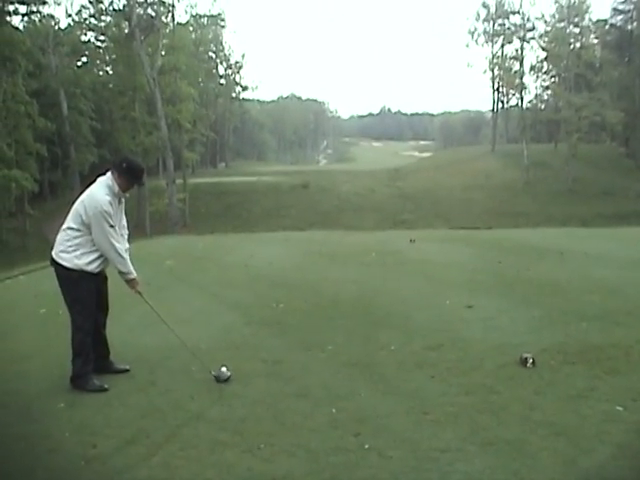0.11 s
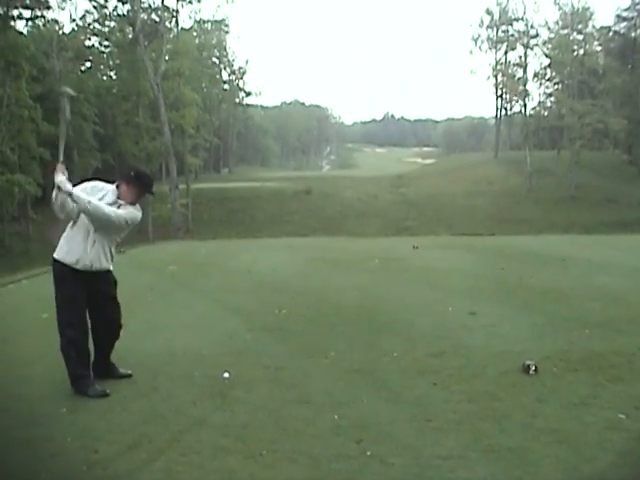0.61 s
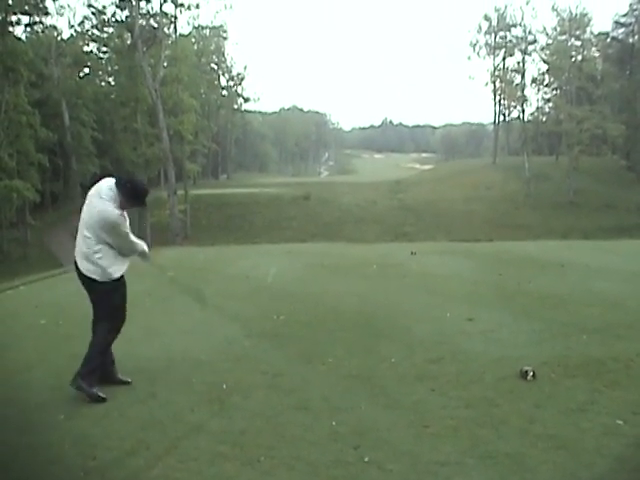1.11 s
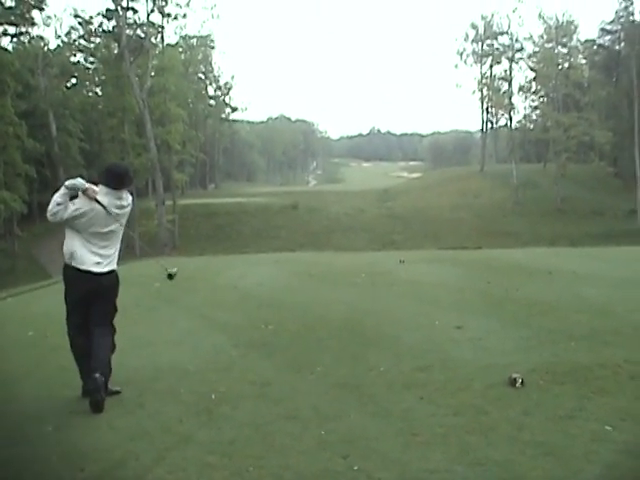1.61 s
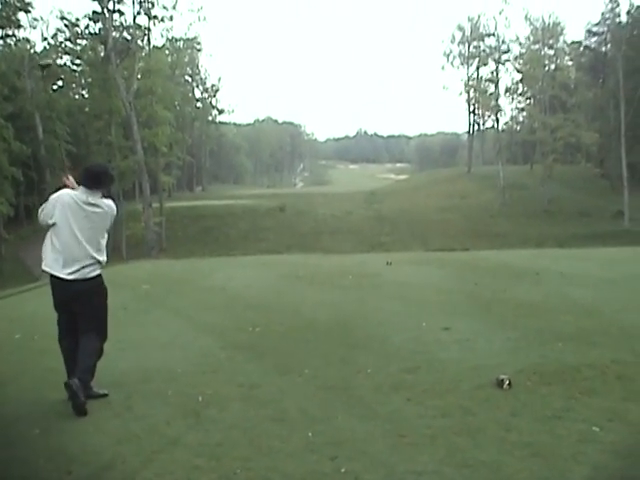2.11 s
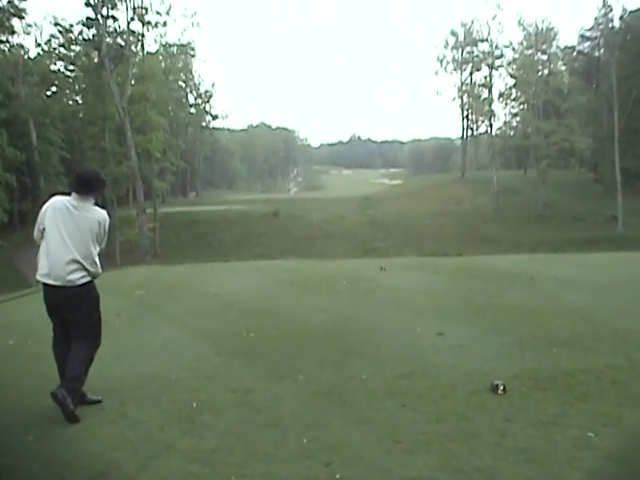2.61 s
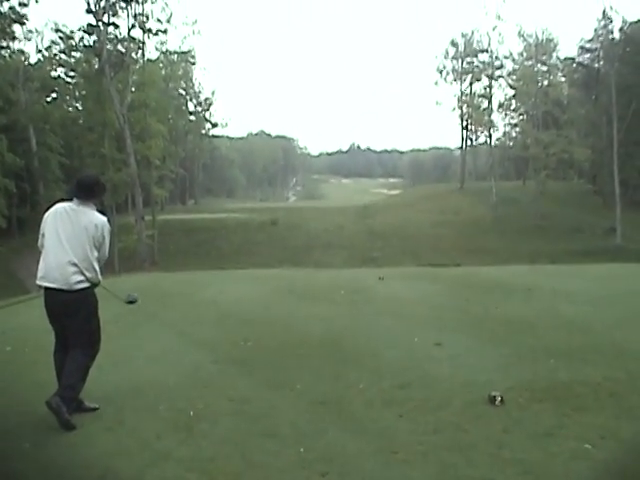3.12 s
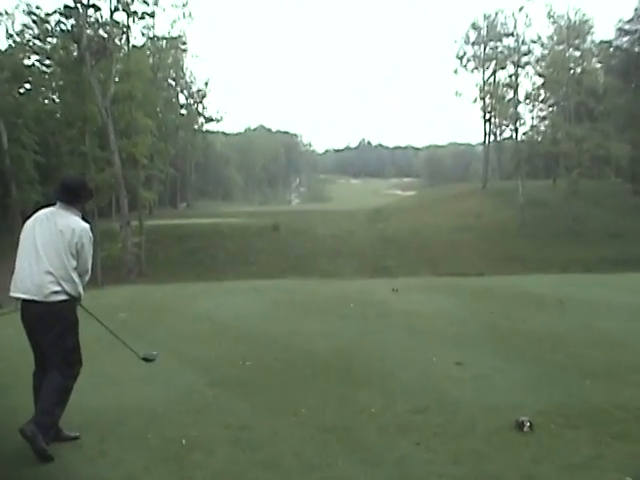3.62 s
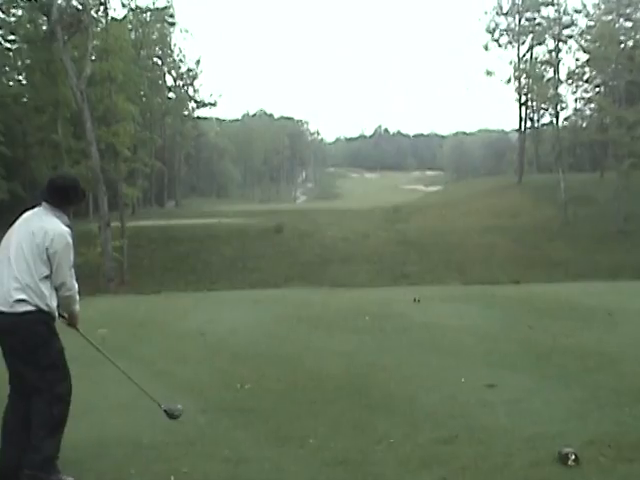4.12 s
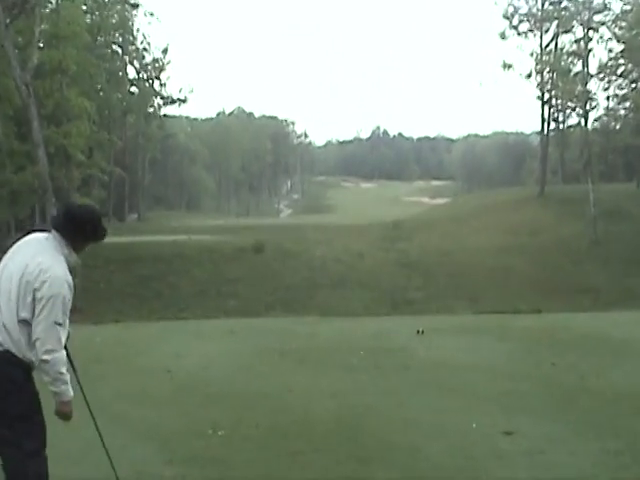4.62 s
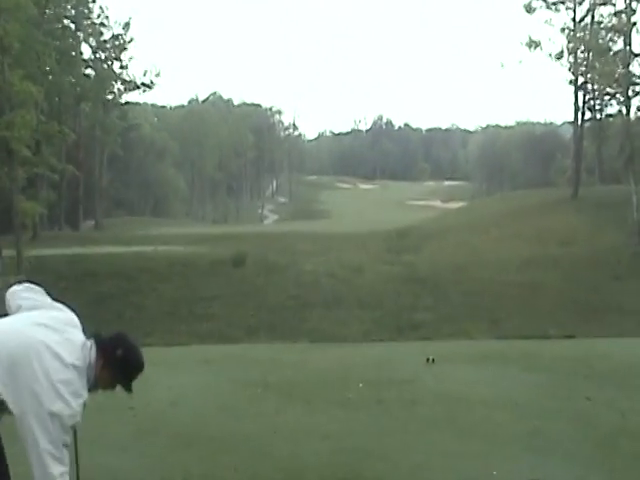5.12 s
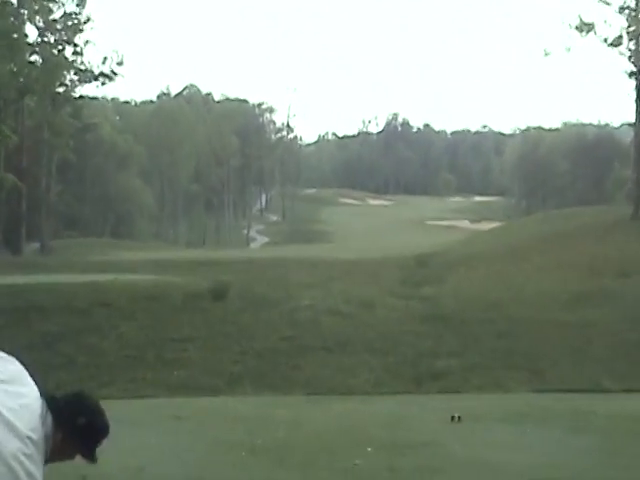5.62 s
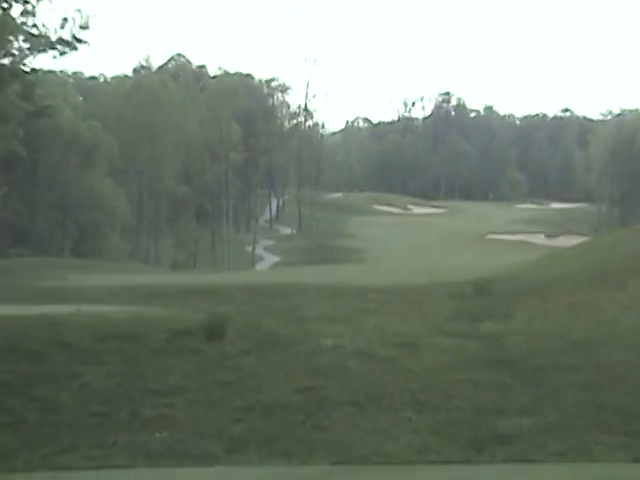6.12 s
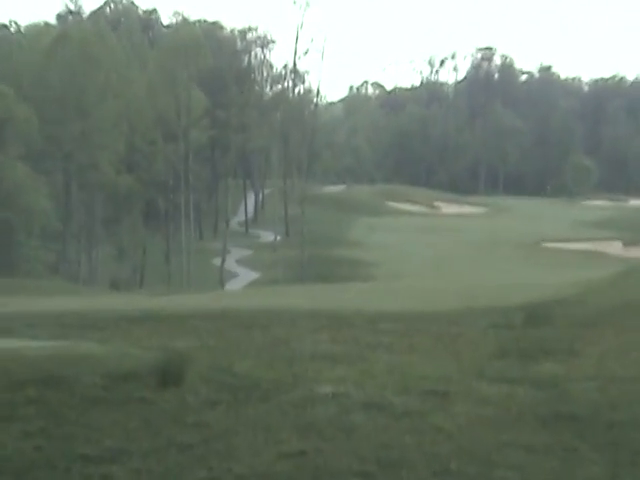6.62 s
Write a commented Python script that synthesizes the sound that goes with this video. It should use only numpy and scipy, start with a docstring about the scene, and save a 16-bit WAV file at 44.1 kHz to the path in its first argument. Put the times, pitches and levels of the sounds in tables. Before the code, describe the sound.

On a quiet golf tee beside woods, a bird gives short whistled chirps over leaf rush and hiss. A club swishes down and strikes the ball with one loud, sharp, ringing crack; the trees throw back a diffuse echo. Afterwards, soft dry knocks, distant pips and another near bird phrase are heard while low breeze rumbles on the stereo microphone.

```python
"""Golf drive beside woods

A driver swishes down (noise at the shedding pitch) and cracks a ball on a tee (decaying modes and noise);
the tree line throws the crack back (scattered noise echo). One bird sings near, others far (gliding sines).
A faint trill (throbbing sine), small knocks (dead modes), a brush of cloth, a breeze on the microphone
ports and a rush of leaves and hiss (shaped noise) fill the rest."""
import sys
import numpy as np
from scipy import signal
from scipy.io import wavfile
from scipy.ndimage import uniform_filter1d

SR = 44100
rng = np.random.default_rng(int(sys.argv[2]) if len(sys.argv) > 2 else 0)


def put_to_file(sound):
    """Save the sound as 16-bit audio at rate SR, in the file named by the first command-line argument."""
    columns = np.atleast_2d(sound).T  # one column per channel
    safe = np.clip(columns, -1, 1)
    whole_steps = np.round(safe * 32767)
    wavfile.write(sys.argv[1], SR, whole_steps.astype(np.int16))


def field_ratio(decibels):
    """Amplitude ratio for a level in dB (20 dB per decade); scalars and array-likes work."""
    return 10 ** (np.asarray(decibels, dtype=float) / 20)


N = 297675
STRIKE_S = 1.16708
STOP_DB_PER_S = 900   # the swish dies once the ball is struck


def rms_one(x):
    """Scale to unit rms."""
    return x / np.sqrt(np.mean(x ** 2) + 1e-20)


def in_time(rows):
    """Columns of a table as curves over the whole length."""
    s, *columns = np.transpose(rows)
    return [np.interp(np.arange(N) / SR, s, c) for c in columns]


def at_hz(points, hz):
    """Read a table on a log frequency axis."""
    return np.interp(np.log(hz), np.log(np.array(points)[:, 0]), np.array(points)[:, 1])


def drift(rate):
    """Slow random curve of unit rms: low-passed noise drawn every 40 samples."""
    r = np.exp(-80 * np.pi * rate / SR)
    slow = signal.lfilter([1], [1, -2 * r, r * r], rng.standard_normal(N // 40 + 2002))[2000:]
    return np.interp(np.arange(N) / 40, np.arange(len(slow)), rms_one(slow))


def band(x, low_hz, high_hz):
    """Band-pass."""
    return signal.sosfilt(signal.butter(2, [low_hz, high_hz], "band", fs=SR, output="sos"), x)


def bands(low_hz, count):
    """Half-octave bands: low edge, centre, high edge."""
    edges = low_hz * 2 ** (np.arange(count + 1) / 2)
    return zip(edges, np.sqrt(edges[1:] * edges[:-1]), edges[1:])


def pan(x, left_db):
    """Left louder by left_db."""
    return x * field_ratio(np.array([[left_db / 2], [-left_db / 2]]))


def widen(mid, side, alike):
    """Stereo from two independent noises; alike is the left-right likeness."""
    return np.sqrt(1 + alike) * mid + np.sqrt(1 - alike) * side * [[1], [-1]]


def add(out, s, piece):
    """Mix a piece in at a time."""
    at = round(s * SR)
    out[..., at:at + piece.shape[-1]] += piece[..., :N - at]


def strike():
    """The ball flattens on the face and leaves; the hollow head rings on, flickering as it turns; turf tears."""
    # ball squashed on the face: (pitch [Hz], level [dB], t60 [s])
    ball_modes = [(1050, 4, .006), (1650, -3, .008), (2500, -5, .01), (6200, -3, .05), (8100, -14, .02)]
    # club head: (pitch [Hz], level [dB], t60 [s], delay until the mode faces the microphone [s])
    head_modes = [(8300, -30, .09, .008), (3110, -26, .2, 0), (3310, -20, .22, .01), (3400, -25, .25, 0),
                  (5150, -22, .06, .003), (5480, -23, .3, .003), (5410, -7, .08, .019),
                  (5620, -14, .09, .019), (5900, -21, .08, .003), (6400, -19, .07, .003),
                  (2040, -19, .17, .022), (4060, -19, .22, .035)]
    contact_s, away_s = .0018, .072   # the follow-through carries the head away
    head_right_db, waver_turns = 2.0, .1   # the ring leans right; its phase wavers
    rise_per_s, rise_s = 0.7, .1   # the head swings round: ring pitch climbs (share per s), then holds
    sizzle_db, sizzle_t60_s = -29, 0.093   # crowded top modes, heard as a bright burst
    t = np.arange(SR // 2) / SR
    crack, ring = np.zeros(N), np.zeros((2, N))

    touching = 1 / (1 + (t / contact_s) ** 8)
    squash = sum(field_ratio(db - 60 * t / t60) * np.sin(2 * np.pi * hz * t) for hz, db, t60 in ball_modes)
    add(crack, STRIKE_S, -touching * squash)

    turning = np.minimum(t, rise_s)
    bent = t + rise_per_s * turning * (t - turning / 2)
    for hz, db, t60, turn_s in head_modes:
        facing = (1 - np.exp(-(t / max(turn_s, .001)) ** 5)) / (1 + (t / away_s) ** 8)
        common_db = 3.0 * drift(70)[:len(t)]
        lean_db = 1.2 * drift(30)[:len(t)] - head_right_db / 2
        flicker_db = common_db + lean_db * [[1], [-1]]
        turns = hz * bent + waver_turns * drift(59.7)[:len(t)] + rng.random()
        add(ring, STRIKE_S, field_ratio(db - 60 * t / t60 + flicker_db) * facing * np.sin(2 * np.pi * turns))

    tearing = band(band(rng.standard_normal((2, len(t))), 420, 7800), 19.7, 7950)
    mid, side = tearing * (field_ratio(-13.0 - 60 * t / 0.02) + field_ratio(-19.0 - 60 * t / 0.26))
    add(ring, STRIKE_S, pan(mid + 0.6 * side * [[1], [-1]], 3.0))
    sizzle = band(rng.standard_normal((2, len(t))), 7200, 15500)
    add(ring, STRIKE_S, field_ratio(sizzle_db - 60 * t / sizzle_t60_s) * sizzle)
    return crack, ring


def downswing(t):
    """Shedding pitch [Hz] follows club speed in an S-curve; level [dB] swells to a peak, eases, then stops."""
    slow_hz, fast_hz, speedup_s, speedup_spread_s = 282, 686, 1.066, 0.01285
    peak_s, peak_db, swell_db_per_s, ease_db_per_s = 1.116, -28, 320, 60
    hz = slow_hz + (fast_hz - slow_hz) * (1 + np.tanh((t - speedup_s) / speedup_spread_s / 2)) / 2
    late = t - peak_s
    fall_db = np.where(late < 0, -swell_db_per_s * late, ease_db_per_s * late)
    fall_db = fall_db + STOP_DB_PER_S * np.maximum(t - STRIKE_S, 0)
    return hz, peak_db - np.minimum(fall_db, 200)


def swish():
    """Vortices shed by shaft and head: a breathy tone that follows club speed, on broad rush."""
    start_s, head_pitch_share = 0.9, .36   # the fat head sheds lower than the shaft
    # the head's wake grows until impact; levels at impact
    wake_swell_db_per_s, body_db, rush_db, hiss_db = 165, -33.5, -33, -45
    t = np.arange(N) / SR
    hz, shaft_db = downswing(t)
    turn = 2 * np.pi * np.cumsum(hz) / SR
    head_turn = head_pitch_share * turn
    # slow noise on a carrier: a narrow noise band around the shedding pitch
    wobble = signal.lfilter([1], [1, -np.exp(-2 * np.pi * 60 / SR)], rng.standard_normal((4, N)))
    shaft = rms_one(wobble[0] * np.cos(turn) + wobble[1] * np.sin(turn))
    body = rms_one(wobble[2] * np.cos(head_turn) + wobble[3] * np.sin(head_turn))
    shaft, body = band(np.array([shaft, body]), 130, 1000)
    before_db = wake_swell_db_per_s * np.maximum(STRIKE_S - t, 0)
    after_db = STOP_DB_PER_S * np.clip(t - STRIKE_S, 0, .2)
    rush = rms_one(band(band(rng.standard_normal(N), 800, 3800), 800, 3800))
    hiss = rms_one(band(band(rng.standard_normal(N), 4600, 8500), 4600, 8500))
    wake = field_ratio(body_db) * body + field_ratio(rush_db) * rush + field_ratio(hiss_db) * hiss
    return (t > start_s) * (field_ratio(shaft_db) * shaft + field_ratio(-before_db - after_db) * wake)


def woods(x, delay_s, swell_s, alike, clumpy_db, lasts, trunks=()):
    """Countless trunks scatter sound: a clumpy stereo noise that swells, then dies band by band."""
    # echo colour: (frequency [Hz], density [dB per Hz])
    colour = [(150, -14), (400, -11), (900, -1), (2200, -4), (3400, 0), (4200, 2), (6500, -4), (8000, -18),
              (10500, -18), (14000, -33.5)]
    # decay, multiplied by lasts: (frequency [Hz], t60 [s])
    decay = [(300, 3.13), (2100, 1.34), (5500, 0.96), (11000, 1.04)]
    trunk_s = .003   # width of one trunk's answer
    t = np.arange(2 * SR) / SR
    white, tail = rng.standard_normal((2, 2, len(t))), 0
    for k, (low, hz, high) in enumerate(bands(low_hz=120, count=14)):
        level_db = at_hz(colour, hz) - 60 * t / (lasts * at_hz(decay, hz))
        tail = tail + band(white[k % 2], low, high) * field_ratio(clumpy_db * drift(25)[:len(t)] + level_db)
    trunks_db = sum(db * np.exp(-((t - s) / trunk_s) ** 2) for s, db in trunks)
    clumps = field_ratio(clumpy_db / 2 * drift(97)[:len(t)] + trunks_db)
    tail = rms_one(tail * clumps * (1 - np.exp(-t / swell_s))) / np.sqrt(len(t))
    mid, side = np.pad(tail, [(0, 0), (round(delay_s * SR), 0)])
    echo = widen(mid, side, np.clip(alike, 0, 1))
    return signal.fftconvolve(x[None], echo, axes=1)[:, :N]


def whistle(path, from_db, to_db, attack_s, release_s, beak):
    """One near-sine note along a pitch path; inside a burry stretch the pitch trembles fast."""
    # burry stretches: (start [s], end [s], trill rate [per s], starting depth [Hz])
    burrs = [(.236, .27, 230, 450), (.705, .92, 78, 190), (4.44, 4.48, 120, 220), (4.5, 4.62, 65, 170)]
    # the open beak favours mid pitches; scaled by the argument beak: (pitch [Hz], response [dB])
    beak_response = [(1850, -21), (2250, -9.5), (2750, -0.5), (3300, 1), (3800, -6.5), (4450, -10)]
    s, hz = np.transpose(path)
    t = np.arange(s[0], s[-1], 1 / SR)
    pitch = uniform_filter1d(np.interp(t, s, hz), size=300, mode="nearest")
    level = field_ratio(np.linspace(from_db, to_db, len(t)) + beak * at_hz(beak_response, pitch))
    for start, end, per_s, depth_hz in burrs:
        depth = (t > start) * np.clip((end - t) / (end - start), 0, 1) ** .5 * depth_hz
        pitch = pitch + depth * np.sin(2 * np.pi * per_s * t + drift(17.8)[:len(t)])
    edges = np.clip(np.minimum((t - s[0]) / attack_s, (s[-1] - t) / release_s), 0, 1)
    return s[0], np.sqrt(2) * edges * level * np.sin(2 * np.pi * np.cumsum(pitch) / SR)


ATTACK_S, RELEASE_S = .007, .007   # bird notes


def near_bird():
    """Slurs, lead-in notes and chips of the near song, coloured by the beak."""
    # slurred notes: (level at start [dB], level at end [dB], path of (time [s], pitch [Hz]))
    slurs = [(-64, -48, [(0, 2900), (.045, 2550), (.065, 3010)]), (-45.5, -37, [(.572, 2890), (.58, 3290),
             (.622, 2995), (.638, 3520), (.65, 3500)]), (-38.5, -47, [(.66, 1910), (.683, 1836),
             (.698, 2740), (.76, 2800), (.9, 2980)]), (-48.5, -44, [(2.515, 2980), (2.53, 4540),
             (2.553, 2620)]), (-39, -38, [(2.545, 2710), (2.57, 3020), (2.635, 3170), (2.7, 2717),
             (2.74, 2230), (2.77, 2560), (2.805, 3840), (2.825, 4140), (2.843, 2420)]),
             (-32.5, -55, [(4.345, 2750), (4.395, 2530)]), (-32, -47, [(4.4, 2650), (4.427, 2260),
             (4.448, 3250), (4.467, 2700)]), (-34.5, -41, [(4.49, 1855), (4.51, 2147), (4.57, 2105),
             (4.6, 2884), (4.64, 2657)]), (-39, -44, [(6.655, 3950), (6.667, 4150), (6.692, 3030)]),
             (-41, -41.5, [(6.688, 3500), (6.72, 3740), (6.76, 3900)])]
    # lead-ins scoop up, hold, flick up: (time [s], length [s], held pitch [Hz], level [dB])
    lead_ins = [(.479, .087, 3570, -52.5), (4.27, .07, 3110, -55)]
    # chips hook onto their end pitch: (time [s], length [s], from [Hz], to [Hz], level [dB])
    short_chips = [(0.197, 0.084, 2500, 3190, -57), (0.552, 0.034, 3100, 3540, -46),
                   (0.645, 0.041, 4920, 3740, -39.5), (4.327, 0.022, 2255, 3150, -49),
                   (4.459, 0.028, 4150, 3110, -43.5)]
    scoop, scoop_s, flick, flick_s = .17, .012, .36, .016   # shares of pitch, times
    hook = .16   # share of the length in which a chip's glide dies away
    near, notes = np.zeros(N), list(slurs)
    for s, length, hz, db in lead_ins:
        end = s + length
        path = [(s, hz * (1 - scoop)), (s + scoop_s, hz), (end - flick_s, hz), (end, hz * (1 + flick))]
        notes.append((db, db, path))
    for s, length, from_hz, to_hz, db in short_chips:
        path = [(s + share * length, to_hz + (from_hz - to_hz) * np.exp(-share / hook))
                for share in np.linspace(0, 1, 9)]
        notes.append((db, db, path))
    for from_db, to_db, path in notes:
        add(near, *whistle(path, from_db, to_db, ATTACK_S, RELEASE_S, beak=0.78))
    return near * field_ratio(1.77 * drift(62.6))


def far_birds():
    """Distant slides, pips, held notes and ragged warbles; moving air makes them flutter."""
    # plain slides: (time [s], length [s], from [Hz], to [Hz], level [dB])
    far_slides = [(1.865, 0.085, 2420, 3620, -59), (5.505, 0.07, 4080, 3300, -61),
                  (0.235, 0.021, 5580, 4860, -48)]
    # repeated falling slide: (length [s], from [Hz], to [Hz], level [dB])
    falling = (.045, 4270, 3300, -61.5)
    # its steady run: (first [s], gap [s], unevenness [s])
    run = (5.601, .0803, .002)
    # shape of a low pip: (length [s], from [Hz], to [Hz])
    pip_shape = (0.03, 2080, 1850)
    # pips: (time [s], level [dB])
    pip_times = [(4.989, -61), (5.14, -51), (5.295, -53), (5.46, -54), (5.95, -58), (6.12, -47.5),
                 (6.304, -51), (6.49, -52), (6.673, -52)]
    # held note: (drop-in [s], from [Hz], onto [Hz], sagging to [Hz], level [dB])
    held_shape = (.03, 3920, 3760, 3680, -64.5)
    # held notes: (time [s], length [s])
    held_notes = [(4.33, .14), (4.64, .145), (4.888, .15), (5.122, .145), (5.338, .115)]
    # warbler notes that slide onto a pitch: (time [s], length [s], from [Hz], to [Hz], starting level [dB])
    ragged_notes = [(1.99, .17, 3550, 3050, -61.5), (3.7, .16, 3050, 3170, -58),
                    (5.3, .14, 2500, 3110, -58), (5.48, .24, 2700, 3130, -57),
                    (5.905, .12, 2650, 2780, -53), (6.245, .14, 2350, 2730, -52),
                    (6.585, .1, 2400, 2800, -53)]
    run_count, flutter_db = 13, 1.5
    bend = .36   # slides start slowly: share of the glide done at half time
    scoop, fade_db, unrest_hz, unrest_db = .25, 15, 90, 3.5   # ragged notes; scoop is a share of length
    far = np.zeros(N)

    first, gap, uneven = run
    run_s = first + gap * np.arange(run_count) + uneven * rng.standard_normal(run_count)
    repeats = [(s, *falling) for s in run_s] + [(s, *pip_shape, db) for s, db in pip_times]
    for s, length, from_hz, to_hz, db in list(far_slides) + repeats:
        path = [(s, from_hz), (s + length / 2, from_hz + bend * (to_hz - from_hz)), (s + length, to_hz)]
        add(far, *whistle(path, db, db, attack_s=.012, release_s=.012, beak=0))

    drop, from_hz, onto_hz, sag_hz, db = held_shape
    for s, length in held_notes:
        path = [(s, from_hz), (s + drop, onto_hz), (s + length, sag_hz)]
        add(far, *whistle(path, db, db, ATTACK_S, drop, beak=0))

    for s, length, from_hz, to_hz, db in ragged_notes:
        times = np.arange(s, s + length, .004)
        pitch = np.interp(times, [s, s + scoop * length], [from_hz, to_hz])
        path = list(zip(times, pitch + unrest_hz * rng.standard_normal(len(times))))
        start, note = whistle(path, db, db - fade_db, scoop * length, RELEASE_S, beak=0)
        add(far, start, note * field_ratio(unrest_db * drift(40)[:len(note)]))
    return far * field_ratio(flutter_db * drift(20.0))


def knocks():
    """Dry taps close by: a few dead modes and a bright snap."""
    # taps: (time [s], level [dB], pitch [Hz], snap against the level [dB])
    taps = [(1.027, -44, 784, 17), (2.86, -34.5, 1006, 19), (3.142, -40, 530, -23.5), (3.219, -55, 417, 22),
            (3.257, -41, 584, -10), (3.269, -25, 732, 13), (3.475, -54, 803, -11.5), (4.01, -44, 850, 1),
            (4.646, -42.5, 733, 4), (5.226, -45, 955, 13)]
    # modes: (ratio to the pitch [1], level [dB])
    overtones = [(.62, -5.5), (1.001, 3.5), (1.3, -0.5), (2.05, -1), (2.699, 3), (3.8, -7)]
    rise_s, body_t60_s, snap_t60_s = .0003, 0.033, 0.0082   # body: t60 at ratio 1
    t, out = np.arange(SR // 10) / SR, np.zeros(N)
    for s, db, hz, snap_db in taps:
        body = sum(field_ratio(level - 60 * np.sqrt(ratio) * t / body_t60_s) * np.sin(2 * np.pi * ratio * hz * t)
                   for ratio, level in overtones)
        noise = band(band(rng.standard_normal(len(t)), 1400, 6400), 1300, 6900)
        snap = noise * field_ratio(snap_db - 60 * t / snap_t60_s)
        add(out, s, field_ratio(db) * (body + snap) * (1 - np.exp(-(t / rise_s) ** 2)))
    return out


def cloth():
    """A jacket brushes as the player bends: a short, soft hiss of band-passed noise."""
    # brush: (centre [s], spread [s], level [dB])
    brush = (5.3, .15, -57)
    s, spread, db = brush
    swell = np.exp(-((np.arange(N) / SR - s) / spread) ** 2)
    return field_ratio(db + 2.0 * drift(14)) * swell * rms_one(band(rng.standard_normal((2, N)), 3200, 6200))


def breeze():
    """Lumpy pressure on the two ports, mostly opposed between left and right."""
    # strength: (time [s], level [dB])
    strength = [(0, -58), (1.4, -52), (2.3, -47.5), (3.2, -49.5), (4.2, -49.5), (4.7, -45), (6.75, -51)]
    # colour: (frequency [Hz], density [dB per Hz])
    buffet = [(12, -40), (20, -6.5), (81, 5.5), (133, -5.5), (268, -31.5), (450, -57.5), (880, -120)]
    brightens = .15   # strong lumps reach higher: extra share of their swing per octave above 60 Hz
    white, out = rng.standard_normal((2, 2, N)), 0
    lumps_db = 4.0 * drift(20) + .8 * drift(5)
    for k, (low, hz, high) in enumerate(bands(low_hz=19.0, count=9)):
        gain_db = at_hz(buffet, hz) + brightens * lumps_db * np.log2(hz / 60)
        out = out + band(white[k % 2], low, high) * field_ratio(gain_db)
    mid, side = out * field_ratio(lumps_db + [[0], [1.2]] * drift(40.2))
    ports = mid + field_ratio(7) * side * [[1], [-1]]
    return pan(field_ratio(in_time(strength)[0]) * ports / np.std(mid), 1.2)


def air():
    """Smooth far rush of leaves and microphone hiss: noise shaped and widened band by band."""
    # strength: (time [s], level [dB])
    rustle = [(0, -52), (6.75, -50.5)]
    # colour: (frequency [Hz], density [dB per Hz])
    colour = [(88, -30), (170, -3.5), (700, -6.5), (1700, -13), (2180, -10), (2630, -24.5), (2900, -15),
              (12700, -32), (14000, -39)]
    # left-right likeness: (frequency [Hz], share [1])
    likeness = [(640, .1), (3100, .6), (6800, .35)]
    white, out, gust = rng.standard_normal((2, 2, N)), 0, drift(9.34)
    for k, (low, hz, high) in enumerate(bands(low_hz=159.6, count=13)):
        mid, side = band(white[k % 2], low, high)
        alike = np.clip(at_hz(likeness, hz), -1, 1)
        gain = field_ratio(at_hz(colour, hz) + .5 * gust + .8 * drift(6))
        out = out + gain * widen(mid, side, alike)
    out = signal.sosfilt(signal.cheby2(8, 40, 15300, fs=SR, output="sos"), out)
    return field_ratio(in_time(rustle)[0]) * rms_one(out)


def trill():
    """A far frog or insect holds one pitch and throbs fast."""
    pitch_hz, throbs_per_s, mean_db = 2135, 58, -65.5
    t = np.arange(N) / SR
    throb = 1 + 1.14 * np.cos(2 * np.pi * (throbs_per_s * t + 0.343 * drift(2.5)))
    tone = np.sin(2 * np.pi * (pitch_hz * t + 0.081 * drift(5.4)))
    return field_ratio(mean_db + 2.4 * drift(12.0)) * throb * tone


def scene():
    """Club, birds and their echoes over the steady ground."""
    # the head's strongest regions, carried by the snap: (low [Hz], high [Hz], level [dB])
    snap_colour = [(2940, 3710, -2.5), (4270, 4850, -15), (5810, 6120, -4)]
    # big trunks and banks that answer clearly: (time after the tree line [s], boost [dB])
    big_trunks = [(.005, 2.5), (.045, 3), (.119, 4)]
    tree_line_s = 0.065
    crack, ring = strike()
    wake = swish()
    near, far = near_bird(), far_birds()
    # the trees get the sharp snap of the blow, coloured by the head, and a little of the swish
    snap = np.zeros(N)
    add(snap, STRIKE_S, np.ones(1))
    thrown = field_ratio(-1.0) * band(snap, 150, 8700) + field_ratio(-27) * wake
    thrown = thrown + sum(field_ratio(db) * band(snap, low, high) for low, high, db in snap_colour)
    club_echo = field_ratio(7.5) * woods(thrown, tree_line_s, swell_s=0.007, alike=0.9, clumpy_db=1.1,
                                 lasts=1, trunks=big_trunks)
    bird_echo = field_ratio(-13.5) * woods(near + far, 0.0069, swell_s=0.00121, alike=0.89, clumpy_db=1.5, lasts=.75)
    blow = band(pan(band(crack, 600, 16000), 2.5) + ring, 200, 15500)
    club = blow + pan(wake, 2.5) + club_echo
    song = pan(near, 2.8) + far + bird_echo
    return club + song + knocks() + cloth() + breeze() + air() + trill()


def roll_off(x):
    """The treble ends steeply here."""
    return signal.sosfilt(signal.butter(12, 16520, fs=SR, output="sos"), x)


def record(dry):
    """The input clips at its overload limit, then a steep low-pass cuts the top."""
    cut = signal.cheby2(14, 80, 16600, fs=SR, output="sos")
    mix = signal.sosfilt(cut, np.clip(dry, -.93, .93))
    return roll_off(mix)


dry = scene()
out = record(dry)
put_to_file(out)
```